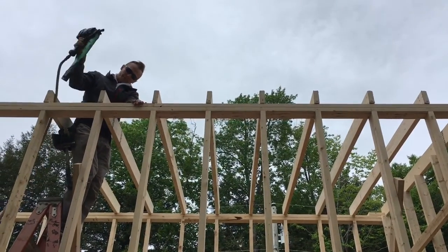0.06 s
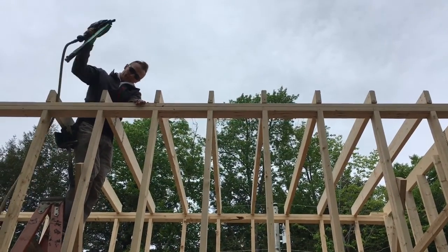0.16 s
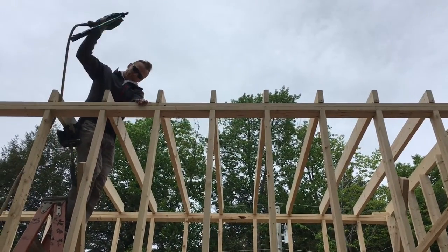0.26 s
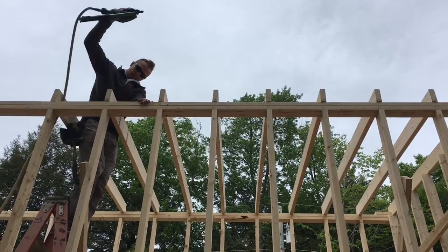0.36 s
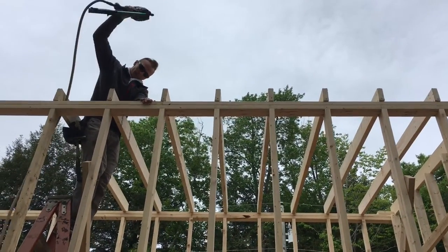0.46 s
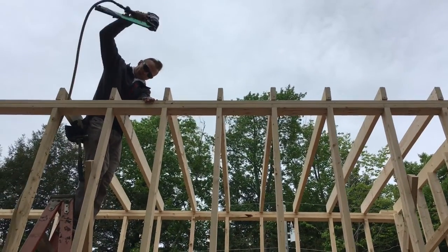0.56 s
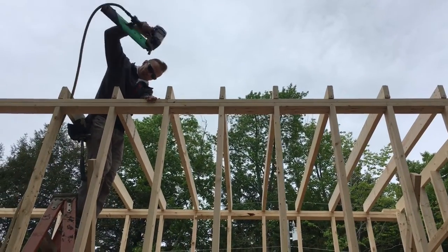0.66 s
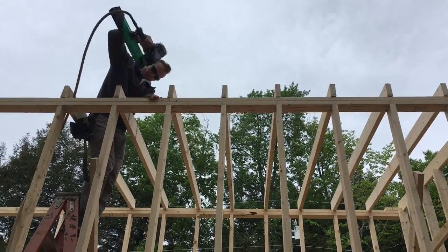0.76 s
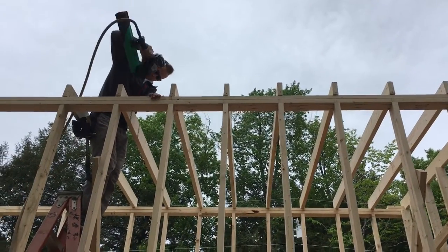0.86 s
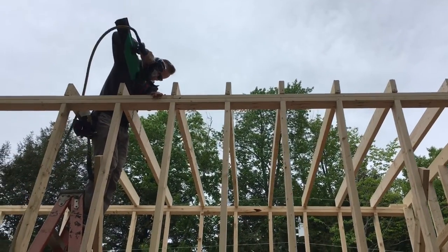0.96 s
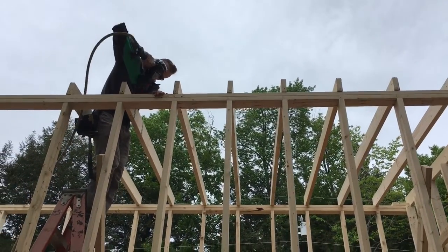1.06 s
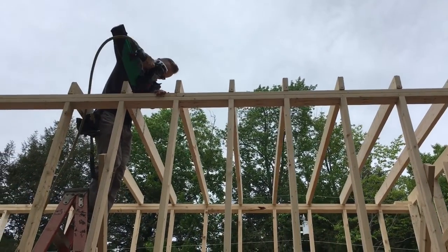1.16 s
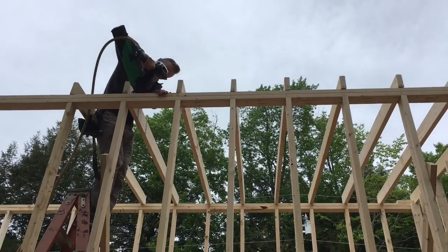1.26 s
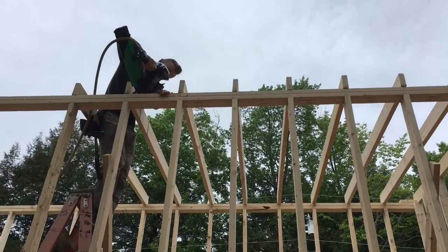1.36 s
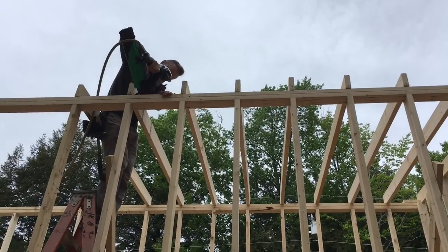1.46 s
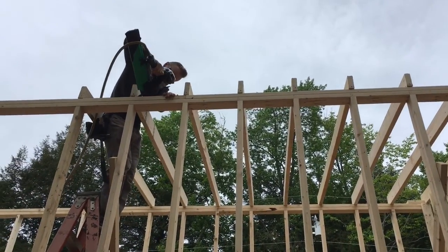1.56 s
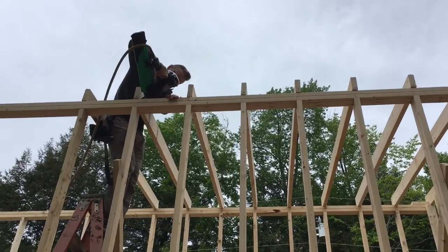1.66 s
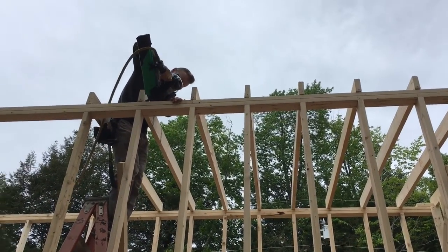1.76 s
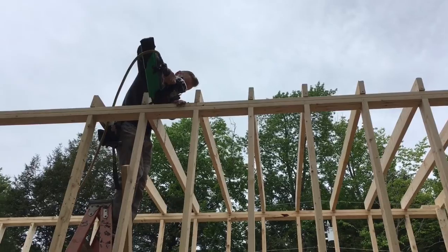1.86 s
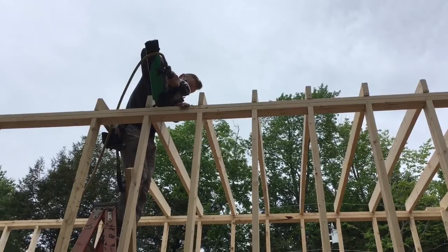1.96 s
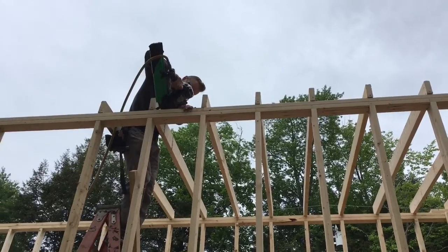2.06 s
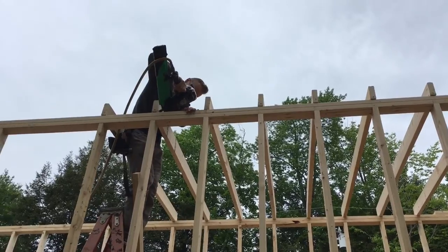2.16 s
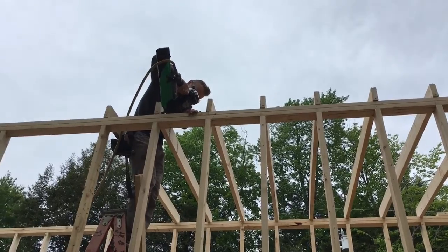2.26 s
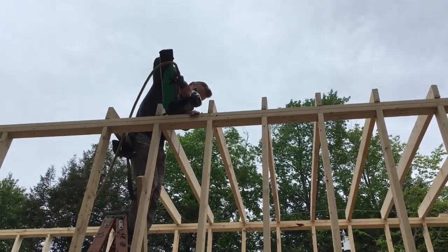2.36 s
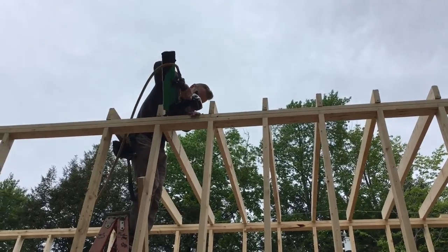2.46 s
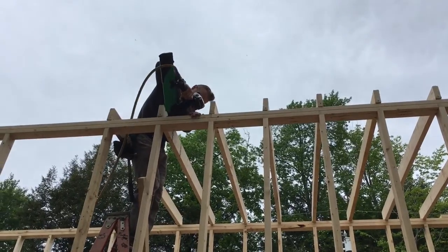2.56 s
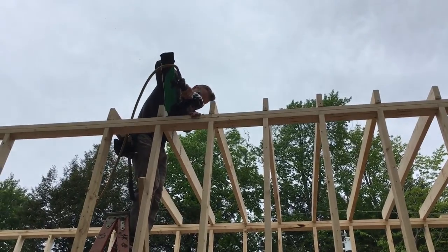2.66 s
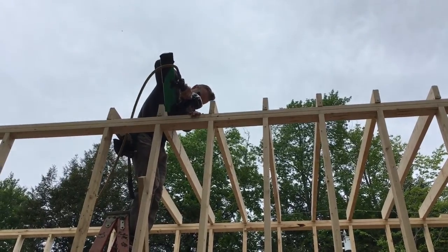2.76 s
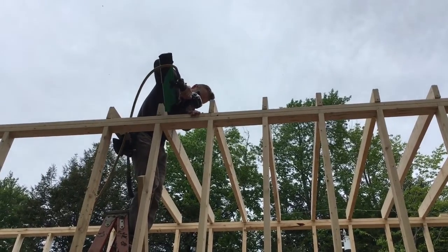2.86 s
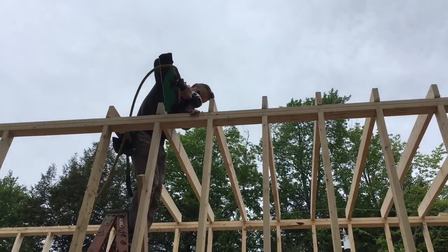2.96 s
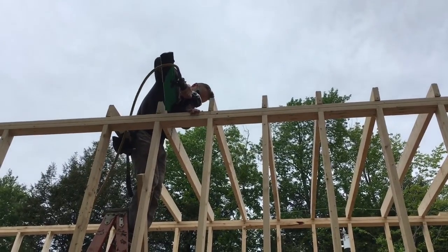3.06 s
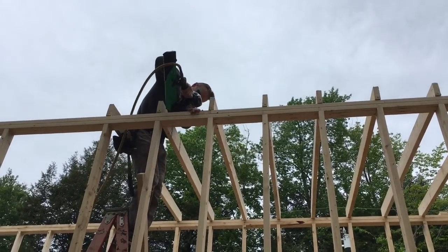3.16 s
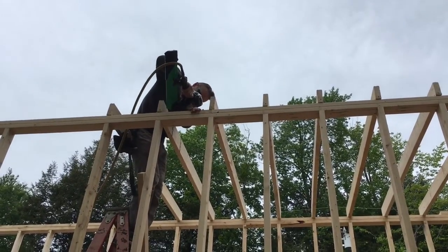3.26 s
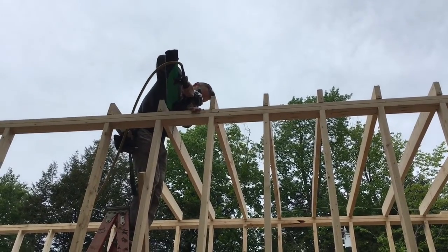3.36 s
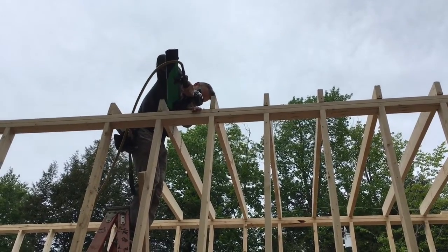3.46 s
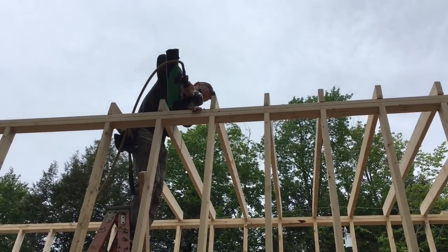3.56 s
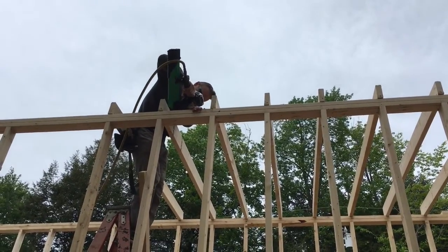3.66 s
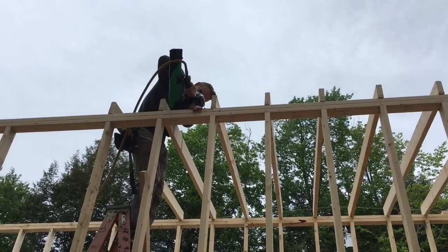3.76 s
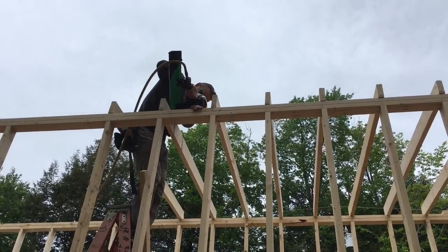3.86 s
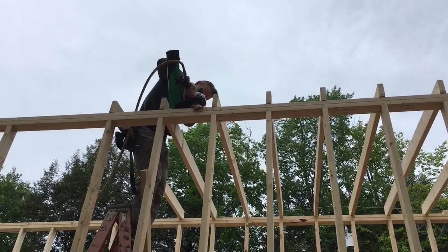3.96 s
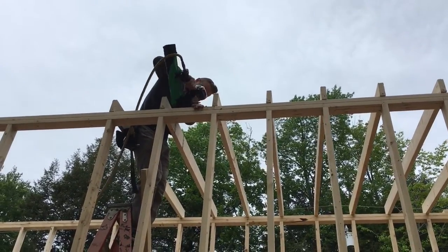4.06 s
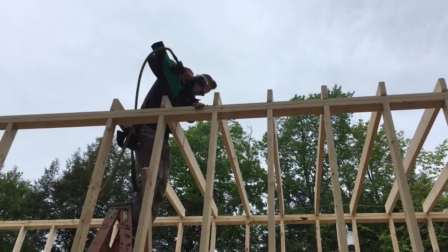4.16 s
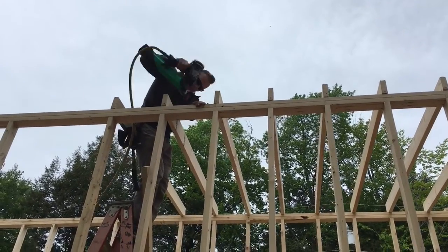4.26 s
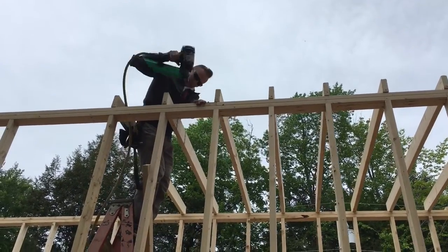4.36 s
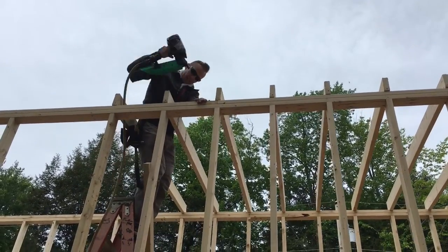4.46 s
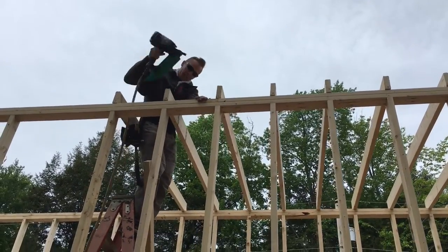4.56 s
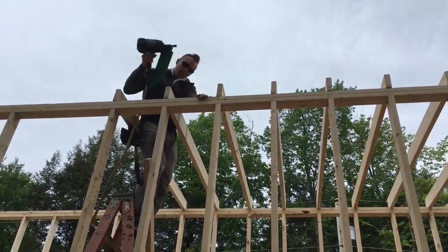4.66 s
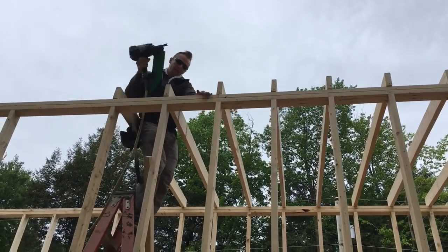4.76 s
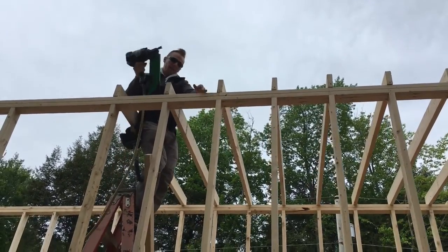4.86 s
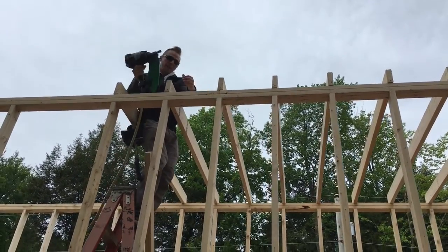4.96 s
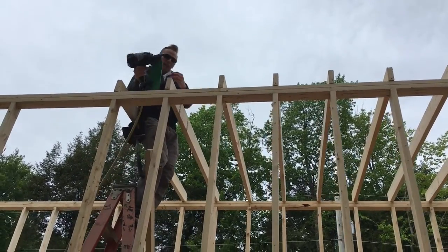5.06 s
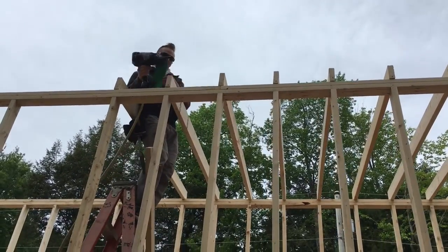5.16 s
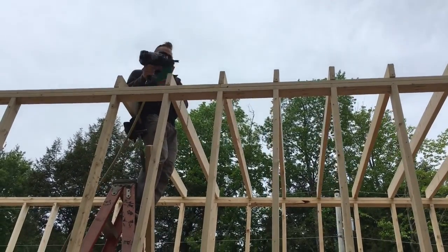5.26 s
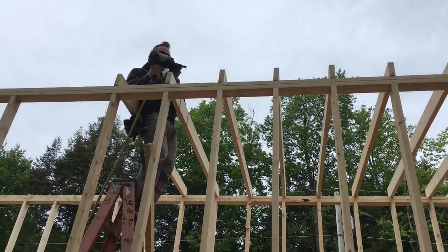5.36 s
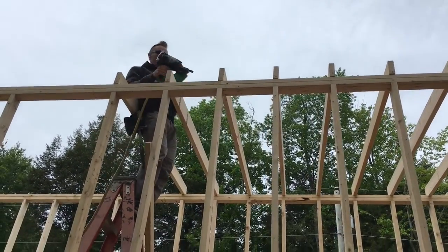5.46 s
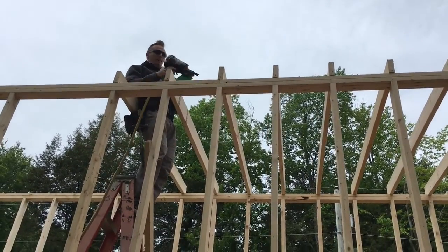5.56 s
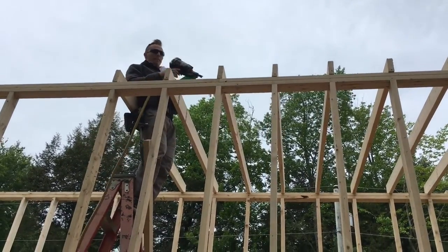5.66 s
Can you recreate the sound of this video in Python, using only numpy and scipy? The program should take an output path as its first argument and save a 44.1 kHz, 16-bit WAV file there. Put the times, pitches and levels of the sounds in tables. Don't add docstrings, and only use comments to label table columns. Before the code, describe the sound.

Faint boot thuds, a dragged hose and light metal taps on timber lead to two very loud nailer shots, the second slightly heavier and boomier. Each snaps, spits compressed air and rolls off into the woods; small bright clicks follow the first. Afterwards come a firm boot knock and several duller steps. Quiet open-air site with birds and distant traffic, heard from a few metres away by phone.

```python
import sys
import numpy as np
from scipy import signal
from scipy.fft import rfft, irfft, next_fast_len
from scipy.io import wavfile
from scipy.ndimage import uniform_filter1d

SR = 44100
rng = np.random.default_rng(int(sys.argv[2]) if len(sys.argv) > 2 else 0)


def inscribe(sig):
    pcm = np.round(np.clip(np.atleast_2d(sig).T, -1, 1) * 32767)
    wavfile.write(sys.argv[1], SR, pcm.astype(np.int16))


def attenuation_scalar(level_db):
    decades = np.asarray(level_db, float) / 20
    return 10 ** decades


N = 251315
TIME = np.arange(N) / SR
FAST = next_fast_len(N)
BANDS = 32 * 2 ** np.arange(0, 9.1, .5)

# start [t/s], blow [level/dB], exhaust rms [level/dB], exhaust t60 [t/s], deck [level/dB]
SHOTS = [
    (2.5791, 0, -14.5, .2, -4.5),
    (3.9352, 2.5, -17, 0.26, -0.5),
]
# [f/Hz], width [f/Hz], [level/dB]
FRAME = [(126, 66, 7.5), (294, 11, -0.5), (613, 45, -3), (767, 53, -17), (1052, 18, -5.5), (1286, 60, -6.5),
         (1730, 280, -15), (2190, 25, -14.5), (2213, 15, -17), (2520, 48, -17.5)]


def unit(x):
    return x / np.sqrt(np.mean(x ** 2))


def on_log(hz, table_hz, values):
    return np.interp(np.log(hz), np.log(table_hz), values)


def shape(x, table):
    hz = np.arange(1, FAST // 2 + 2) * SR / FAST
    gain = attenuation_scalar(on_log(hz, *np.transpose(table)))
    return irfft(rfft(x, FAST) * gain, FAST)[:N]


def coloured(table):
    return unit(shape(rng.standard_normal(N), table))


def band(hz):
    return [(hz / 2, -60), (hz / 1.19, -3), (hz, 0), (hz * 1.19, -3), (hz * 2, -60)]


def bank():
    return [coloured(band(hz)) for hz in BANDS]


def resonance(hz, width):
    width = max(width, 1.05)
    return coloured([(hz / width ** 3, -40), (hz / width, -8), (hz, 0), (hz * width, -8),
                     (hz * width ** 3, -30), (6 * hz * width ** 3, -90)])


def walk(rate):
    k = int(SR / rate)
    return unit(uniform_filter1d(uniform_filter1d(rng.standard_normal(N), k), k))


def fade(t, rise, t60):
    t = np.maximum(t, 0)
    return (1 - np.exp(-t / rise)) * np.exp(-np.log(1000) * t / t60)


def add(out, s, x):
    i = int(max(s, 0) * SR)
    out[i:i + len(x)] += x[:len(out) - i]


def knocks(table, grain, lag, longer, width, ring_db, own_db, modes):
    out = np.zeros(N)
    for s, db, hz, bass_db, treble_db, t60 in table:
        t = np.arange(int(3 * t60 * SR) + 9) / SR
        i = int(s * SR)
        shape_hz = [40, 90, 170, hz / width, hz, hz * width, 3000 + hz * width]
        shape_db = on_log(BANDS, shape_hz, [bass_db - 9.5, bass_db, bass_db, -6, 0, -8, treble_db])
        blow = attenuation_scalar(own_db) * np.sin(2 * np.pi * hz * t) * fade(t, 0.91 / hz, t60 / 4)
        for band_hz, band_db, noise in zip(BANDS, shape_db, grain):
            late = lag * (1000 / band_hz) ** 0.6 + .0006
            band_t60 = t60 * (1000 / band_hz) ** longer
            blow += attenuation_scalar(band_db) * noise[i:i + len(t)] * fade(t - late / 2, late, band_t60)
        for mode_hz, mode_db, mode_t60 in modes:
            wobble = rng.standard_normal(2)
            near_db = -6 * abs(np.log2(mode_hz / hz)) + 3 * wobble[0]
            ring = np.sin(2 * np.pi * mode_hz * (1 + 0.019 * wobble[1]) * t)
            blow += attenuation_scalar(ring_db + mode_db + near_db) * ring * fade(t, 1 / mode_hz, mode_t60)
        add(out, s, attenuation_scalar(db) * blow)
    return out


def frame_modes():
    return [(hz, db, min(6 / width, .11)) for hz, width, db in FRAME]


def cracks():
    pulses = [
        (2.5793, -2, 1930, 2.1),
        (2.586, 3, 1720, 1.1),
        (2.59, -12, 6900, 12),
        (2.593, -3.5, 5925, 5.7),
        (3.9358, -0.5, 1960, 2.1),
        (3.9446, -10.5, 1730, 1.2),
        (3.9503, -13.5, 1500, 0.99),
    ]
    out = np.zeros(N)
    t = np.arange(900) / SR
    for s, db, hz, cycles in pulses:
        pulse = np.sin(2 * np.pi * hz * t) * fade(t, 0.52 / hz, 3 * cycles / hz)
        add(out, s - .5 / hz, -attenuation_scalar(db + 6) * pulse)
    return out


def jets():
    # [f/Hz], [level/dB per Hz]
    jet_spectrum = [(880, -36), (1500, 0.5), (2600, -3.5), (5420, -11), (6300, -2.5), (7500, -7.5),
                    (13000, -3), (16000, -1.5)]
    # after firing [t/s], rms [level/dB], rise [t/s], hold [t/s], t60 [t/s]
    valve = [
        (-.0225, -52.5, .002, .018, .04),
        (-.0051, -34.5, .002, .003, .03),
        (0, -13.5, .0011, 0.026, .075),
    ]
    hiss = coloured(jet_spectrum)
    top = coloured([(6000, -53), (11000, -2.5), (16000, -5.5)])
    flutter = attenuation_scalar(2.2 * walk(500))
    bursts = [(s + after, db + blow_db, *rest) for s, blow_db, *_ in SHOTS for after, db, *rest in valve]
    # 26 ms after firing, rise 4 ms, hold 22 ms
    bursts += [(s + .026, db, .004, .022, t60) for s, _, db, t60, _ in SHOTS]
    out = np.zeros(N)
    for s, db, rise, hold, t60 in bursts:
        closing = np.exp(-np.log(1000) * np.maximum(TIME - s - hold, 0) / t60)
        gate = fade(TIME - s, rise, 99) * closing
        out += attenuation_scalar(db) * gate * (hiss + attenuation_scalar(-13) * top)
    return out * flutter


def booms(grain):
    answers = [
        (.003, -13.5, 1367, -16, 0.12),
        (.014, -17, 1150, -13, 0.21),
    ]
    treble_db = -10.5
    rows = [(s + after, db + blow_db, hz, bass_db, treble_db, t60)
            for s, blow_db, *_ in SHOTS for after, db, hz, bass_db, t60 in answers]
    return knocks(rows, grain, lag=.006, longer=0.25, width=1.1, ring_db=0.5, own_db=-19, modes=frame_modes())


def ticks(grain):
    # [t/s], peak [level/dB], pitch [f/Hz], bass [level/dB]
    clicks = [(0.4436, -37, 3300, -6), (0.4624, -39.5, 8500, -27), (0.595, -62.5, 8200, -14.5),
              (0.6528, -45, 9900, -20), (2.117, -49.5, 4300, -10), (2.532, -41.5, 6150, -15),
              (2.5553, -39.5, 2520, -16.5), (2.566, -39.5, 1800, -14.5), (2.889, -36, 11400, -13.5),
              (2.8952, -27.5, 9400, -26), (2.914, -36, 12800, -26), (2.9187, -37, 10200, -16),
              (3.0753, -34, 10950, -19), (3.079, -44, 13000, -27.5), (3.087, -42.5, 9000, -24),
              (3.0967, -36, 9100, -22.5), (3.111, -45, 8970, -21.5), (3.6034, -53, 9240, -14.5),
              (3.8951, -42.5, 5500, -18), (3.9112, -40, 2500, -16), (3.926, -37, 1900, -20),
              (4.258, -56, 12000, -20), (4.78, -37.5, 5580, -22), (5.0044, -55.5, 9040, -2.5),
              (5.3011, -41.5, 2270, -1), (5.475, -44, 8860, -48), (5.5872, -43.5, 8920, -21),
              (5.6187, -47.5, 9150, -33)]
    # [t/s], peak [level/dB], pitch [f/Hz], treble [level/dB]
    edges = [
        (0.428, -48, 1360, -21),
        (0.598, -33, 1780, -26),
        (1.143, -36, 1520, -17),
        (1.511, -47.5, 1690, -12),
        (2.539, -44.5, 800, -17),
        (4.758, -21, 1780, -12.5),
        (4.795, -32, 2340, -4.5),
        (4.842, -37.5, 2080, -9),
        (5.617, -42.5, 1630, -10.5),
    ]
    click_treble_db, click_t60_s = -2, .036
    edge_bass_db, edge_t60_s = -20, .026
    rows = [(s, db, hz, bass_db, click_treble_db, click_t60_s) for s, db, hz, bass_db in clicks]
    rows += [(s, db, hz, edge_bass_db, treble_db, edge_t60_s) for s, db, hz, treble_db in edges]
    return attenuation_scalar(-5) * knocks(rows, grain, lag=.0001, longer=0.45, width=1.2, ring_db=-40, own_db=-1, modes=[])


def thuds(grain):
    # [t/s], peak [level/dB], centre [f/Hz], bass [level/dB], t60 [t/s]
    dull = [(0.001, -33.5, 377, 2.5, 0.14), (0.428, -32.5, 1335, -13.5, 0.28),
            (0.599, -29.5, 716, -11, 0.27), (0.645, -33.5, 330, -7, 0.19), (0.925, -38, 860, -9, 0.18),
            (1.092, -40, 848, -5, 0.73), (1.14, -32, 287, -20.5, 0.19), (1.328, -47, 280, -12, 0.13),
            (4.757, -24.5, 637, -10, 0.15), (4.796, -31, 636, -9, 0.16), (4.838, -35, 270, -23, 0.15),
            (5.102, -42.5, 458, -19, 0.3), (5.177, -36.5, 1080, -4, 0.083), (5.258, -32.5, 834, -4, 0.088),
            (5.277, -33, 670, -12, 0.13), (5.303, -30.5, 255, -4.5, 0.28), (5.346, -39.5, 371, -15, 0.15)]
    rows = []
    for s, db, hz, bass_db, t60 in dull:
        treble_db = -23 + 5 * np.log2(hz / 1000)
        rows.append((s, db, hz, bass_db, treble_db, t60))
    return attenuation_scalar(-12) * knocks(rows, grain, lag=.007, longer=0.12, width=1.49, ring_db=3.5, own_db=3.5,
                             modes=frame_modes())


def taps(grain):
    # [t/s], peak [level/dB], pitch [f/Hz], treble [level/dB]
    touches = [
        (0.876, -44, 1460, 0),
        (1.439, -43, 899, -4),
        (1.45, -29, 1300, -9),
        (1.513, -40.5, 1050, -20),
        (1.628, -50.5, 1300, -14),
        (1.95, -51.5, 1300, -5),
        (2.095, -49, 1310, -10),
        (2.239, -48.5, 640, -3.5),
        (5.498, -43.5, 985, -22),
    ]
    # [f/Hz], [level/dB], t60 [t/s]
    nose = [(595, 0, 0.062), (1059, -6, 0.11), (1303, -2.5, 0.054), (1780, -1, 0.044), (1990, -26, 0.065),
            (2656, -5, 0.059)]
    bass_db, t60_s = -34, .06
    rows = [(s, db, hz, bass_db, treble_db, t60_s) for s, db, hz, treble_db in touches]
    return attenuation_scalar(-15.5) * knocks(rows, grain, lag=0.00038, longer=0.24, width=1.1, ring_db=9, own_db=6.5,
                               modes=nose)


def sways():
    # after firing [t/s], rms [level/dB], centre [f/Hz], width [ratio], t60 [t/s]
    shake = [
        (.02, -18, 136, 1.45, 0.25),
        (.042, -33, 125, 1.5, 1.14),
        (.05, -32.5, 64, 1.87, 1.7),
    ]
    # [t/s], rms [level/dB], centre [f/Hz], t60 [t/s]
    steps = [
        (.62, -42, 75, 0.72),
        (4.799, -46, 80, 1.4),
        (5.295, -47, 140, 0.43),
    ]
    rows = [(s + after, db + deck_db, *rest) for s, *_, deck_db in SHOTS for after, db, *rest in shake]
    rows += [(s, db, hz, 1.6, t60) for s, db, hz, t60 in steps]
    out = np.zeros(N)
    for s, db, hz, width, t60 in rows:
        out += attenuation_scalar(db) * resonance(hz, width) * fade(TIME - s, .028 * t60, t60)
    return out


def hose():
    # [t/s], [f/Hz], [level/dB]
    groan = [(0.1, 270, -62), (0.156, 295, -53), (0.178, 305, -46.5), (.235, 323, -43.5), (0.26, 335, -49),
             (0.3, 377, -51.5), (0.346, 393.6, -59.5), (.385, 421, -48.5), (0.44, 425, -50.5)]
    s, hz, db = np.transpose(groan)
    phase = 2 * np.pi * np.cumsum(np.interp(TIME, s, hz) * (1 + .04 * walk(90))) / SR
    shiver = attenuation_scalar(3 * walk(110) - 2.5)
    level_db = np.interp(TIME, s, db, -99, -99)
    low = attenuation_scalar(level_db) * np.sin(phase)
    high = attenuation_scalar(level_db + 4 * walk(40) - 17) * np.sin(2 * phase)
    return np.sqrt(2) * shiver * (low + high)


def rubs():
    # [t/s], rms [level/dB], centre [f/Hz], width [ratio], length [t/s]
    strokes = [
        (0.093, -65, 1550, 7.3, 0.46),
        (0.688, -66, 1610, 2.5, 0.33),
        (.93, -68, 1650, 1.05, 0.26),
        (1.15, -64, 300, 0.91, 0.16),
        (4.388, -64, 297, 1.3, 0.33),
        (4.913, -64, 1150, 1.35, 0.078),
        (5.371, -65, 1055, 1.2, 0.086),
        (4.246, -72, 10060, 2.2, 1.042),
    ]
    out = np.zeros(N)
    for s, db, hz, width, length in strokes:
        swell = np.sin(np.pi * np.clip((TIME - s) / length, 0, 1)) ** 0.29
        out += attenuation_scalar(db) * resonance(hz, width) * swell
    return out * attenuation_scalar(2 * walk(60))


def coupling_leak():
    # [t/s], [level/dB]
    leak_level = [(0.0, -76), (0.152, -56), (0.426, -61), (0.468, -48), (0.486, -62.5), (0.756, -68),
                  (0.8, -99), (0.82, -85), (0.85, -82)]
    # [f/Hz], [level/dB per Hz]
    leak_spectrum = [(4710, -45), (8000, -19.5), (10700, -16), (12200, 3.5), (15300, -3.5), (16200, 1),
                     (16400, -21.5), (16500, -57)]
    level_db = np.interp(TIME, *np.transpose(leak_level), right=-99)
    return coloured(leak_spectrum) * attenuation_scalar(level_db + walk(20))


def woods(x):
    # [f/Hz], [level/dB], t60 [t/s]
    echo = [(60, -22.5, 1.2), (140, -24, 0.68), (300, -28.5, 0.65), (800, -22.5, 1.5), (1700, -22, 1.1),
            (3530, -15.5, 0.64), (6500, -14, 0.4), (12000, -26.5, 0.35)]
    hz, db, t60 = np.transpose(echo)
    tree_line_s, tree_line_db, valley_longer = 0.21, -6.5, 2.4
    out = np.zeros(N)
    late = int(tree_line_s * SR)
    for f, noise in zip(BANDS, bank()):
        power = uniform_filter1d(shape(x, band(f)) ** 2, 1301, origin=650)
        band_t60 = on_log(f, hz, t60)
        near = linger(power, band_t60)
        trees = attenuation_scalar(2 * tree_line_db - 8 * abs(np.log2(f / 1300)))
        near[late:] += trees * uniform_filter1d(near, 2000)[:-late]
        valley_db = -10 + 0.5 * f / 1000
        far = attenuation_scalar(2 * valley_db) * linger(power, valley_longer * band_t60)
        out += attenuation_scalar(on_log(f, hz, db)) * np.sqrt(np.maximum(near + far, 0)) * noise
    return out


def linger(power, t60):
    return signal.lfilter([1 / (.05 * SR)], [1, -10 ** (-6 / (t60 * SR))], power)


def birds():
    # [t/s], [level/dB], top [f/Hz], note [t/s]
    chips = [(0.219, -63.5, 6120, 0.013), (0.648, -63, 5780, .019), (0.72, -67.5, 7170, 0.021),
             (1.644, -61.5, 5895, 0.021), (1.931, -66.5, 6380, 0.019), (1.957, -65.5, 5920, 0.016),
             (2.251, -59, 5860, 0.017)]
    # [t/s], [level/dB], top [f/Hz], note [t/s], notes [count]
    whistles = [(.76, -68, 3700, .02, 3), (1.78, -79, 3650, .02, 3), (2.055, -76, 6970, .027, 1),
                (4.57, -67, 5330, 0.045, 1), (4.801, -68, 5500, 0.026, 1), (4.984, -70, 5460, 0.021, 1),
                (5.02, -69, 6440, .025, 2), (5.552, -66, 5970, .02, 3)]
    chip_leap, whistle_leap = .17, .06
    calls = [(*row, 2, chip_leap) for row in chips] + [(*row, whistle_leap) for row in whistles]
    out = np.zeros(N)
    for s, db, end_hz, note, notes, leap in calls:
        u = np.linspace(0, 1, int(note * SR))
        for k in range(int(round(notes))):
            reach = end_hz * (1 - 0.22 * leap * k)
            phase = 2 * np.pi * np.cumsum(reach * (1 - leap * (1 - u) ** 4)) / SR
            chip = np.sin(phase) * np.sin(np.pi * u ** 1.4) ** .7
            add(out, s + 1.15 * k * note, attenuation_scalar(db) * chip)
    out *= attenuation_scalar(2.5 * walk(400))
    t = np.arange(SR // 2) / SR
    leaves = rng.standard_normal(len(t)) * fade(t, 0.0011, 0.94) * attenuation_scalar(-29.5)
    return out + signal.fftconvolve(out, leaves)[:N]


def air():
    # [f/Hz], [level/dB per Hz]
    air_spectrum = [(20, 4.5), (100, -0.5), (330, -14), (900, -14), (2240, -22.5), (7500, -32.5),
                    (15200, -27.5), (16500, -44)]
    # [t/s], [level/dB]
    air_level = [(0, -56), (.6, -56), (1.3, -58), (1.7, -61.5), (2.3, -59.5), (3.3, -60.5), (4.7, -58.5),
                 (5.2, -58), (5.7, -56.5)]
    s, db = np.transpose(air_level)
    rumble = coloured([(25, -22), (55, -0.5), (90, -9), (160, -10), (350, -15), (900, -53.5)])
    heave = attenuation_scalar(-9 + walk(4.8))
    hiss = coloured(air_spectrum) * attenuation_scalar(1.4 * walk(6.1))
    return attenuation_scalar(np.interp(TIME, s, db)) * (hiss + heave * rumble)


def scene():
    rattle = attenuation_scalar(2 * walk(230))
    grain = [np.tile(noise * rattle, 2) for noise in bank()]
    shot = cracks() + jets() + booms(grain)
    handling = thuds(grain) + taps(grain) + ticks(grain) + hose() + rubs()
    near = shot + handling
    return (near + woods(near) + sways() + coupling_leak() + birds() + air())[None]


def roll_off(x):
    return signal.sosfilt(signal.butter(12, 16970, fs=SR, output="sos"), x)


def record(dry):
    low_cut = signal.butter(4, 48, "high", fs=SR, output="sos")
    top_cut = signal.ellip(8, .2, 60, 15850, fs=SR, output="sos")
    mic = signal.sosfilt(low_cut, dry)
    rounded = np.tanh(1.143 * mic) / 1.077 * attenuation_scalar(1.5)
    mic = signal.sosfilt(top_cut, rounded)
    return roll_off(np.clip(mic, -1, 1))


dry = scene()
out = record(dry)
inscribe(out)
```